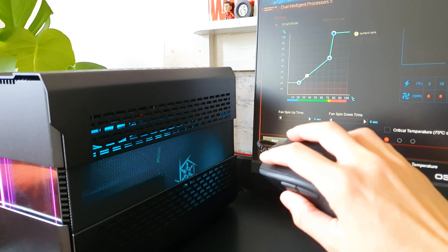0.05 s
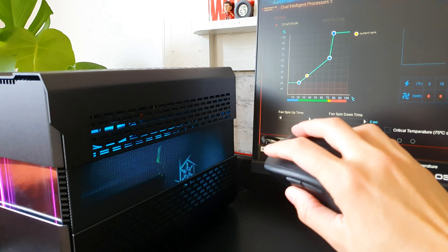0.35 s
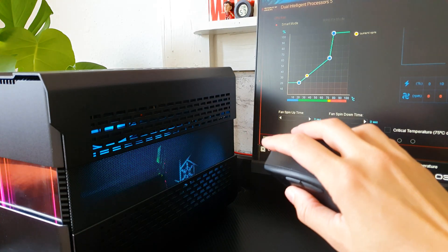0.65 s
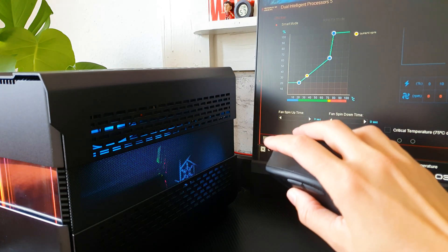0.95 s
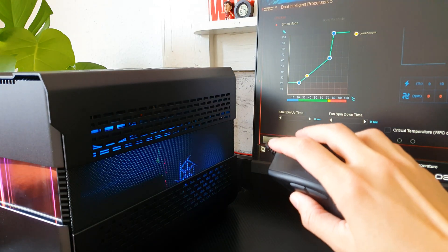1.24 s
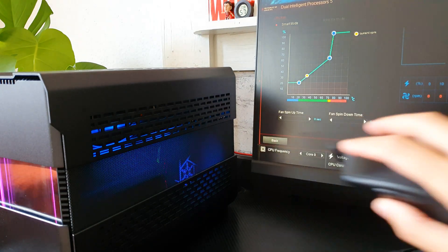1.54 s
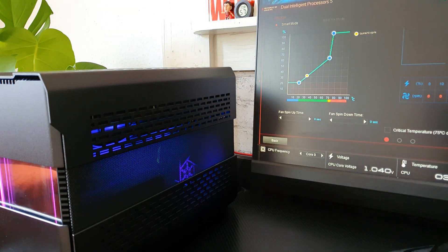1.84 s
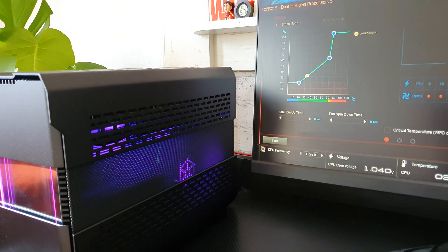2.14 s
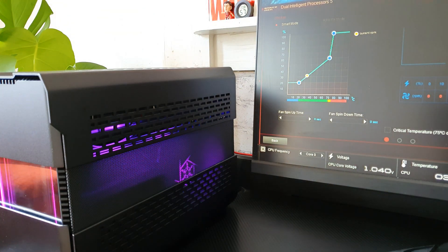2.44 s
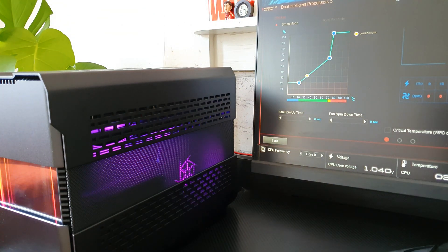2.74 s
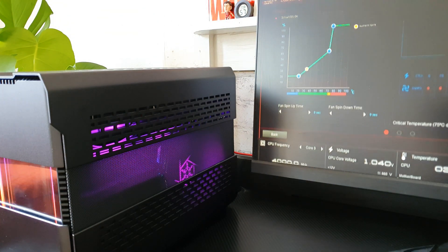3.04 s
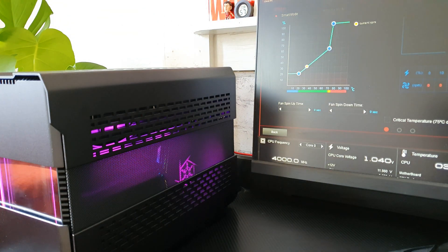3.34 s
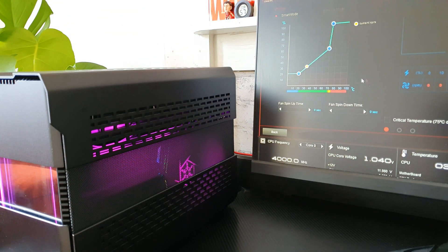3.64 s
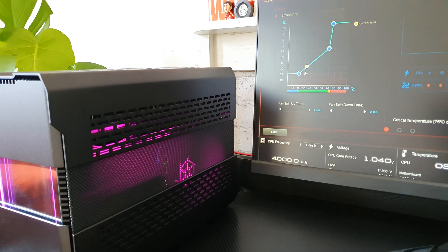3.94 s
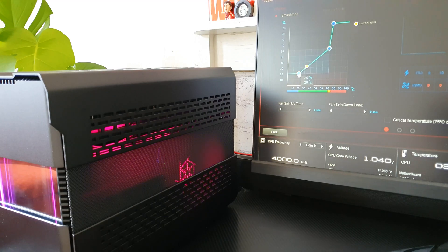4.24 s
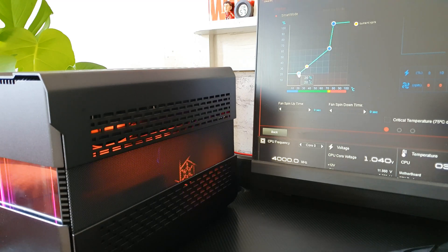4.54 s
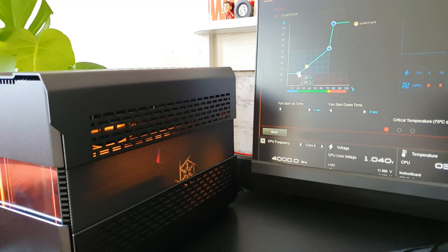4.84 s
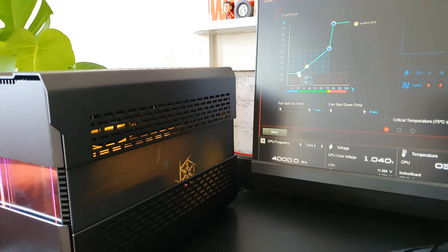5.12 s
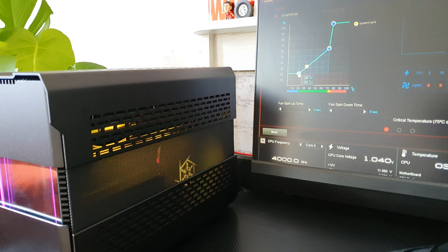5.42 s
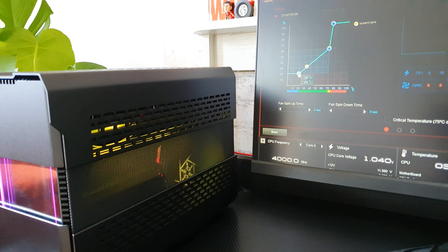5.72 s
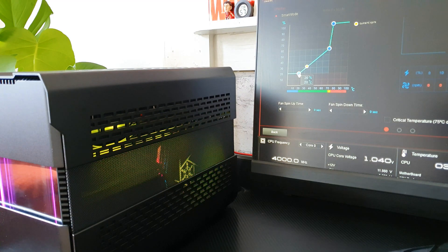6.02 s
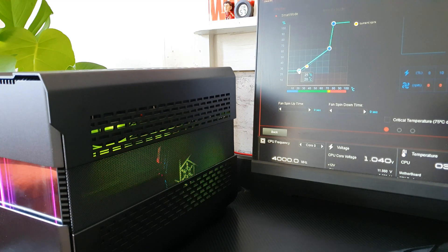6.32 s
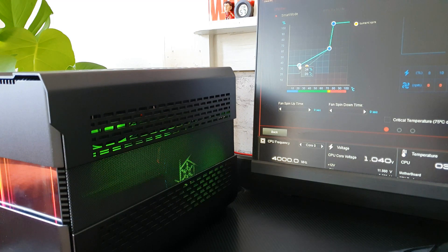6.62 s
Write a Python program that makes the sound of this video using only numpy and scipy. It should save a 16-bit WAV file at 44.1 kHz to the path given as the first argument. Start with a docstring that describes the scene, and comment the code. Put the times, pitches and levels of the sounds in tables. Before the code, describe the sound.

A small computer hums faintly and steadily in a fairly dry little room. Near the microphone, light plastic clacks lead into six rapid, sharp mouse clicks. The mouse rubs and squeaks briefly as it is moved, then its shell hits something with a hard clack and it knocks twice onto the desk. Two lighter clicks come next, then a very soft slide and one last click.

```python
"""A mouse close to a phone gives two light clacks, then is clicked six times fast, its switch ringing the
button on each press and release. It is moved away with a rub and a squeak, its plastic shell clacks
against something hard, and it lands on the desk in two knocks. Three single clicks follow, with a soft
slide before the last. A small computer's pump and fans hum throughout, in a small, fairly dry room."""
import sys
import numpy as np
from scipy import signal
from scipy.fft import rfft, irfft
from scipy.io import wavfile
from scipy.ndimage import uniform_filter1d

SR = 44100
rng = np.random.default_rng(int(sys.argv[2]) if len(sys.argv) > 2 else 0)


def master(y):
    """Save y as 16-bit WAV."""
    cut = np.clip(np.atleast_2d(y).T, -1, 1)
    pcm = np.round(cut * 32767)  # scale
    wavfile.write(sys.argv[1], SR, pcm.astype(np.int16))


N = 298557
HIT_SAMPLES = 32768
TIME_S, ALL_HZ = np.arange(N) / SR, np.fft.rfftfreq(N, 1 / SR) + 1e-3
HIT_S, HIT_HZ = np.arange(HIT_SAMPLES) / SR, np.fft.rfftfreq(HIT_SAMPLES, 1 / SR) + 1e-3
LEFT_RIGHT = np.array([[1], [-1]])  # every pan_db is left minus right


# button modes, going down: pitch_hz, width_hz, level_db
PRESS_MODES = [(790, 110, -2), (2270, 120, -15), (3350, 320, 3), (4580, 290, 4), (5480, 420, -3),
               (6400, 360, -6), (7480, 420, -3), (8480, 360, -1), (9400, 480, -12), (11800, 950, -12),
               (13200, 950, -11), (14500, 700, -16), (15500, 600, -14)]
# button modes, springing back: pitch_hz, width_hz, level_db
RELEASE_MODES = [(820, 110, -2), (2920, 170, -9), (3400, 260, 6.5), (4780, 270, 5), (5400, 450, -1),
                 (6250, 360, 0.5), (7300, 420, -7), (8500, 540, 1), (9700, 300, -7), (12100, 850, -11),
                 (14450, 600, 1), (15300, 540, -6)]
# clicks near the phone: press_s, release_s, press_level_db
RAPID_CLICKS = [(.4825, .5633, -37.2), (.6857, .7505, -37.2), (.8531, .9156, -36.8),
                (1.0197, 1.0819, -37.3), (1.1684, 1.2304, -36.8), (1.3085, 1.3741, -35.8)]

def rapid_clicks(release_boost_db=5.3, room_db=-7, detune=.006):
    """The switch snaps down and back, ringing the button differently each way; the finger detunes it."""
    echoes = undb(room_db) * room(early_db=3, onset_s=.002)

    def snap(start_s, level_db, modes, pan_db, contact_s):
        body = resonances(modes, HIT_HZ * (1 + detune * rng.standard_normal()), skirt=1.4)
        return hit(start_s, level_db, pan_db, body, contact_s, echoes,
                   scatter=.8, phase_scale=.25, flatten=.35)

    out = 0
    for press_s, release_s, level_db in RAPID_CLICKS:
        out += snap(press_s, level_db, PRESS_MODES, pan_db=-1, contact_s=.0011)
        out += snap(release_s, level_db + release_boost_db, RELEASE_MODES, pan_db=-.1, contact_s=.00125)
    return out


# modes of the mouse on the desk: pitch_hz, width_hz, level_db
DESK_CLICK_MODES = [(290, 100, -12), (780, 150, 0), (1750, 220, -12), (3050, 300, -13), (3950, 320, -3.5),
                    (5750, 400, -1.5), (6750, 380, -4), (7900, 420, 0), (8520, 400, 2), (12100, 900, -19),
                    (14000, 900, -19), (15500, 600, -14)]
# single clicks: start_s, level_db, pan_db, pitch_ratio
DESK_CLICKS = [(2.866, -40.5, -2.5, 1.01), (3.277, -33.5, -1.5, .97), (5.7142, -41.5, -2.5, 1.0)]

def desk_clicks(contact_s=.001, room_db=-7):
    """The switch rings the mouse lying on the desk: thinner, single clicks."""
    echoes = undb(room_db) * room(early_db=4, onset_s=.003)
    out = 0
    for start_s, level_db, pan_db, pitch_ratio in DESK_CLICKS:
        body = resonances(DESK_CLICK_MODES, HIT_HZ / pitch_ratio, skirt=1.3)
        out += hit(start_s, level_db, pan_db, body, contact_s, echoes, scatter=.6, flatten=.2)
    return out


# plastic shell modes: pitch_hz, width_hz, level_db
SHELL_MODES = [(390, 110, -13), (620, 130, 0), (800, 120, -4), (1060, 130, -2), (1220, 110, -1),
               (1430, 130, -2), (1700, 240, -4), (2190, 200, 1.5), (2680, 240, -1), (3080, 240, -1),
               (3350, 240, -3), (3800, 340, -8), (4600, 500, -8), (5700, 600, -11), (6500, 500, -13),
               (7700, 500, -20), (12000, 5000, -34)]
# blows to the shell: start_s, level_db, pan_db, treble_edge_hz, bass_db, room_db
CLACKS = [(.0185, -31, -1, 2400, 0, -.5), (.0325, -35.5, -1.5, 1800, 2, -1), (1.323, -50, -1, 2800, -4, -2),
          (2.003, -15.4, -0.5, 7600, -1.5, -1.7), (2.112, -41, 3, 4800, -12, 1.5)]

def shell_clacks():
    """Blows ring the mouse's plastic shell."""
    return blows(CLACKS, SHELL_MODES, room(early_db=5),
                 contact_s=.0014, bass_hz=800, rolloff=2.5, scatter=.5)


# desk modes: pitch_hz, width_hz, level_db
DESK_MODES = [(100, 40, -17), (197, 22, -4), (290, 45, 0), (380, 60, -1), (520, 110, -4), (650, 100, 0),
              (765, 110, 3), (830, 80, 1), (1040, 150, -7), (1290, 220, -10), (1830, 200, -14),
              (2330, 320, -14), (3250, 450, -21), (4400, 700, -28), (6000, 900, -31), (12000, 6000, -43)]
# blows to the desk: start_s, level_db, pan_db, treble_edge_hz, bass_db, room_db
KNOCKS = [(2.4412, -16.5, -4, 500, -20, -3), (2.554, -18.2, -2, 9000, 3.5, -3.5)]

def desk_knocks():
    """The mouse lands and rings the desk."""
    return blows(KNOCKS, DESK_MODES, room(early_db=6.5),
                 contact_s=.0011, bass_hz=580, rolloff=.22, scatter=.45)


def blows(events, modes, echoes, contact_s, bass_hz, rolloff, scatter):
    """Softer contact loses treble; more weight behind a blow brings out the low modes."""
    out = 0
    for start_s, level_db, pan_db, edge_hz, bass_db, room_db in events:
        lowpass = 1 / (1 + 1j * HIT_HZ / edge_hz * np.sqrt(2) - (HIT_HZ / edge_hz) ** 2) ** rolloff
        bass_shelf = undb(bass_db / (1 + (HIT_HZ / bass_hz) ** 4))
        body = resonances(modes, HIT_HZ, polarity=-1) * lowpass * bass_shelf
        out += hit(start_s, level_db, pan_db, body, contact_s, undb(room_db) * echoes, scatter)
    return out


# direct sound at the two microphone ports: freq_hz, right_lead_rad
PORT_PHASE = [(150, 0), (300, .5), (520, 3), (850, 3.5), (2000, 4), (5000, 5.5), (9000, 7.5)]
# balance of the ports: freq_hz, pan_db
PORT_BALANCE = [(150, -2.5), (500, -.5), (1000, .5), (2200, 2.5), (5000, -.5), (9000, -.5), (13000, -4)]

def hit(start_s, level_db, pan_db, body, contact_s, echoes, scatter, phase_scale=1, flatten=0):
    """One blow rings a body, heard directly and via the room; level_db is the direct sound over 10 ms."""
    port_phase = np.exp(-.5j * phase_scale * LEFT_RIGHT * over_hz(PORT_PHASE, HIT_HZ))
    force = contact(contact_s)
    off_hand = np.array([contact(contact_s), contact(contact_s)])  # scattered differently to each port
    direct = unit(unit(body) * (force * port_phase + scatter * off_hand))
    radiated = body / (np.abs(body) + 1e-9) ** flatten  # the room hears all sides: flatter peaks
    reflected = unit(radiated * force) * echoes
    gain = undb(level_db + LEFT_RIGHT * (pan_db + over_hz(PORT_BALANCE, HIT_HZ)) / 2)
    sound = irfft((direct + reflected) * gain) * np.sqrt(SR / 100)
    lead = 512  # samples kept ahead of the onset
    sound = np.roll(sound, lead, axis=1)[:, :-8 * lead]
    return np.pad(sound, ((0, 0), (int(start_s * SR), N)))[:, lead:lead + N]


def contact(contact_s):
    """Force spectrum of touching parts in brief chatter, about equally strong at all frequencies."""
    age = HIT_S / contact_s
    envelope = age * np.exp(-age)
    force = rfft(rng.standard_normal(HIT_SAMPLES) * envelope)
    for _ in range(2):
        whitened = irfft(force / (np.abs(force) + 1e-12))
        force = rfft(whitened * np.sqrt(envelope))
    return unit(force)


def resonances(modes, hz, polarity=1, skirt=1):
    """Damped modes; polarity -1 opposes neighbours, a higher skirt deepens the valleys."""
    return sum(polarity ** k * undb(level_db) / (1 + 1j * (hz**2 - pitch_hz**2) / (hz * width_hz)) ** skirt
               for k, (pitch_hz, width_hz, level_db) in enumerate(modes))


# shell squeaks: start_s, length_s, pitch_hz, level_db
SQUEAKS = [(1.812, .05, 410, -52.5), (1.84, .025, 620, -55), (1.867, .062, 600, -38)]

def squeaks(sag_hz_per_s=300, roughness=.025, flutter_db=2.2, pan_db=-5):
    """The moving shell sticks and slips: tones that catch at once, then weaken and sag in pitch."""
    waver = 1 + roughness * drift(rate_hz=200)
    out = 0
    for start_s, length_s, pitch_hz, level_db in SQUEAKS:
        hz = pitch_hz - sag_hz_per_s * np.clip(TIME_S - start_s, 0, length_s)
        phase = 2 * np.pi * np.cumsum(hz * waver) / SR
        tone = unit(np.sin(phase - LEFT_RIGHT * over_hz(PORT_PHASE, pitch_hz) / 2))
        envelope = stroke(start_s, length_s, attack_s=.004, release_s=.006, fade_db_per_s=160)
        out += tone * undb(level_db) * envelope
    return out * undb(flutter_db * drift(rate_hz=120) + LEFT_RIGHT * pan_db / 2)


# hand and mouse slides: start_s, length_s, level_db
SLIDES = [(1.46, .44, -71.5), (1.65, .06, -70), (3.42, 1.6, -69.5)]

def sliding(rub_hz=1100, rub_width_hz=1900, hiss_hz=13500, hiss_width_hz=5000, hiss_db=-14):
    """A soft rub with fine hiss on top; each slide fades as the hand slows."""
    rub = resonances([(rub_hz, rub_width_hz, 0)], ALL_HZ) ** 2
    hiss = undb(hiss_db) * resonances([(hiss_hz, hiss_width_hz, 0)], ALL_HZ) ** 2
    friction = unit(irfft(rfft(rng.standard_normal((2, N))) * (rub + hiss), N))
    motion = sum(undb(level_db) * stroke(start_s, length_s, attack_s=.07, release_s=.04, fade_db_per_s=9)
                 for start_s, length_s, level_db in SLIDES)
    return friction * motion * undb(1.5 * drift(rate_hz=25))


# fan noise spectrum: freq_hz, density_db
FAN_SPECTRUM = [(25, -20), (45, -9), (80, -6), (165, -13), (205, -3.5), (300, -7.5), (420, -10.5),
                (560, -11.5), (800, -16), (1050, -18), (1300, -26), (3250, -33), (9000, -49), (15000, -41)]
# fan stereo width: freq_hz, side_minus_mid_db
FAN_WIDTH = [(60, -5), (110, -7.5), (200, -8), (380, -1.5), (700, 3.5), (1290, 3), (2380, 1), (4400, 0.5),
             (8120, 0), (15000, 0.5)]
# fan balance: freq_hz, pan_db
FAN_PAN = [(60, -4.5), (110, -2.5), (200, -1.5), (380, -1.0), (700, -0.5), (1290, 0.0), (2380, -2.0),
           (4400, -1.0), (8120, 3.0), (15000, 1.0)]

def fans(hiss_gain_db, level_db=-61.7, hiss_edge_hz=10500, hiss_waver_db=.6, rush_waver_db=.5):
    """Air pushed through the case; the rush and its top hiss waver separately."""
    hiss_gain = undb(hiss_gain_db + hiss_waver_db * drift(rate_hz=4))
    mid, side = rfft(rng.standard_normal((2, N))) * undb(over_hz(FAN_SPECTRUM, ALL_HZ))
    air = (mid + LEFT_RIGHT * side * undb(over_hz(FAN_WIDTH, ALL_HZ))) / np.std(irfft(mid, N))
    air *= undb(level_db + LEFT_RIGHT * over_hz(FAN_PAN, ALL_HZ) / 2)
    is_hiss = ALL_HZ > hiss_edge_hz
    rush = irfft(air * ~is_hiss, N) * undb(rush_waver_db * drift(rate_hz=6))
    return rush + irfft(air * is_hiss, N) * hiss_gain


# pump and motor tones: pitch_hz, level_db, pitch_waver_ratio
PUMP_TONES = [(139.5, -70, .002), (248.5, -69, .006), (495.3, -77, .004), (1001, -81, .005)]

def pump(throb_db=2.0, pan_db=-3):
    """Pump and motors hum on slightly unsteady tones."""
    hum = 0
    for pitch_hz, level_db, waver in PUMP_TONES:
        phase = 2 * np.pi * np.cumsum(pitch_hz * (1 + waver * drift(rate_hz=12))) / SR
        hum += unit(np.sin(phase)) * undb(level_db + throb_db * drift(rate_hz=9))
    return hum * undb(LEFT_RIGHT * pan_db / 2)


# dips in the hum: start_s, length_s
HUM_DIPS = [(1.925, .05), (2.3, .1)]

def computer(dip_db=-5, hiss_extra_dip_db=-6, fade_start_s=3.0, fade_db_per_s=.2):
    """Fans and pump dip before the hard clack and the landing, then slowly soften; the hiss more so."""
    dip = sum(stroke(start_s, length_s, attack_s=.02, release_s=.03) for start_s, length_s in HUM_DIPS)
    fade_db = -fade_db_per_s * np.maximum(TIME_S - fade_start_s, 0)
    air = fans(hiss_gain_db=hiss_extra_dip_db * dip + fade_db)
    return (air + pump()) * undb(dip_db * dip + fade_db)


# room decay: freq_hz, t60_s
ROOM_T60 = [(150, 0.4), (500, 0.44), (1000, 0.35), (2500, 0.3672), (5000, 0.3151), (9000, .28),
            (15000, 0.02)]
# room stereo width: freq_hz, side_minus_mid_db
ROOM_WIDTH = [(150, -9), (300, -2), (550, 2), (900, 3), (2000, 1.5), (5000, 2)]

def room(early_db, early_t60_s=.13, onset_s=.005):
    """Spectrum of dense reflections from desk, screen and case, then the walls' longer tail; energy 1."""
    centres_hz = np.geomspace(100, 16000, 9)
    tail = 0
    for k, hz in enumerate(centres_hz):
        band = np.sqrt(np.interp(np.log(HIT_HZ), np.log(centres_hz), np.arange(len(centres_hz)) == k))
        walls = undb(-60 * HIT_S / over_hz(ROOM_T60, hz))
        early = undb(early_db - 60 * HIT_S / early_t60_s)
        tail += irfft(band * rfft(rng.standard_normal((2, HIT_SAMPLES)))) * (walls + early)
    paths = rfft(tail * (1 - np.exp(-(HIT_S / onset_s) ** 2)))
    # fine combing, flat broad colour
    mid, side = paths / np.sqrt(uniform_filter1d(np.abs(paths) ** 2, size=90, axis=1))
    width = undb(over_hz(ROOM_WIDTH, HIT_HZ))
    return (mid + LEFT_RIGHT * width * side) / np.sqrt(1 + width ** 2)


def stroke(start_s, length_s, attack_s, release_s, fade_db_per_s=0):
    """Envelope: rise, hold with optional fade, die away."""
    age_s = np.maximum(TIME_S - start_s, 0)
    rise = np.minimum(age_s / attack_s, 1)
    hold = undb(-fade_db_per_s * np.minimum(age_s, length_s))
    release = np.exp(-np.clip((age_s - length_s) / release_s, 0, 20))
    return rise * hold * release


def drift(rate_hz):
    """Random drift, rms 1."""
    step = int(SR / rate_hz)
    stairs = np.repeat(rng.standard_normal(N // step + 1), step)
    return unit(uniform_filter1d(stairs, step)[:N])


def over_hz(table, hz):
    """Read a (freq_hz, value) table on a log-frequency axis."""
    freq_hz, value = np.transpose(table)
    return np.interp(np.log(hz), np.log(freq_hz), value)


def undb(db):
    """Decibels to gain."""
    return np.exp(np.asarray(db) * (np.log(10) / 20))


def unit(x):
    """Scale to rms 1."""
    return x / np.sqrt(np.mean(np.abs(x) ** 2))


def scene():
    """Knocks, clicks and handling over the computer's hum."""
    impacts = shell_clacks() + desk_knocks()
    return impacts + rapid_clicks() + desk_clicks() + squeaks() + sliding() + computer()


def record(dry, cutoff_hz=15850):
    """The phone cuts the top."""
    return signal.sosfilt(signal.ellip(8, .2, 70, cutoff_hz, fs=SR, output="sos"), dry)


dry = scene()
out = record(dry)
master(out)
```